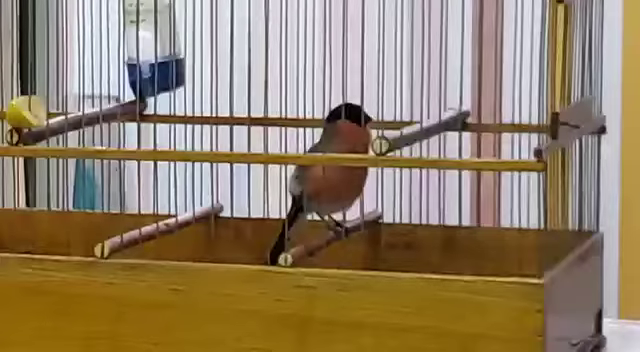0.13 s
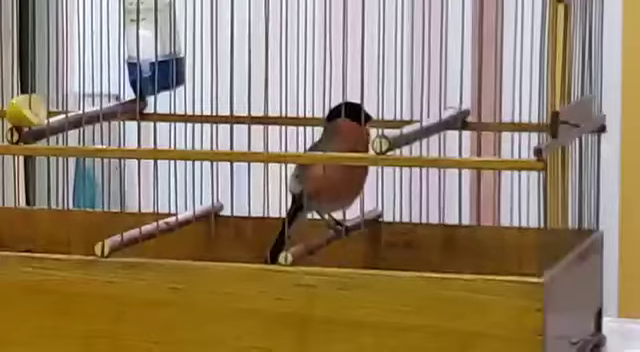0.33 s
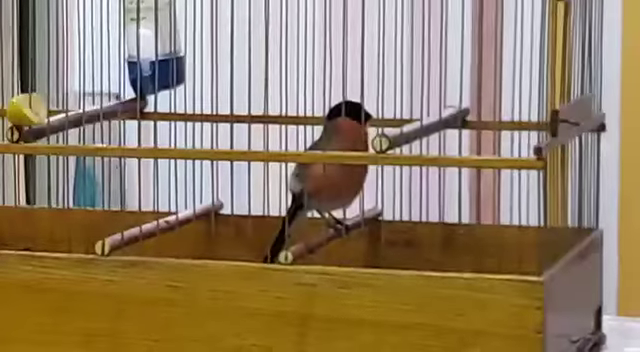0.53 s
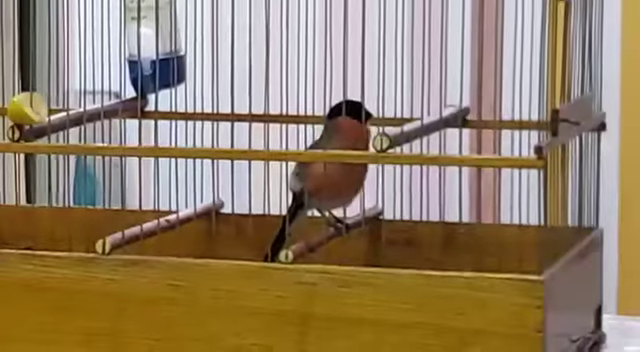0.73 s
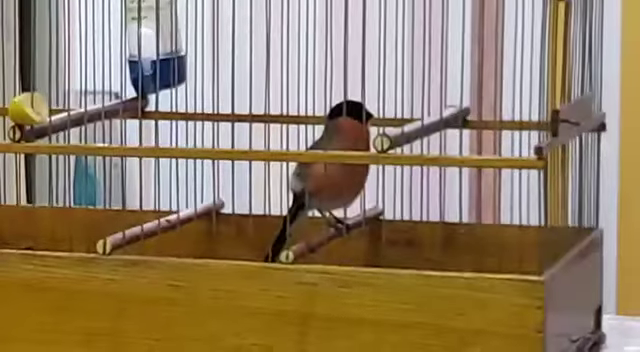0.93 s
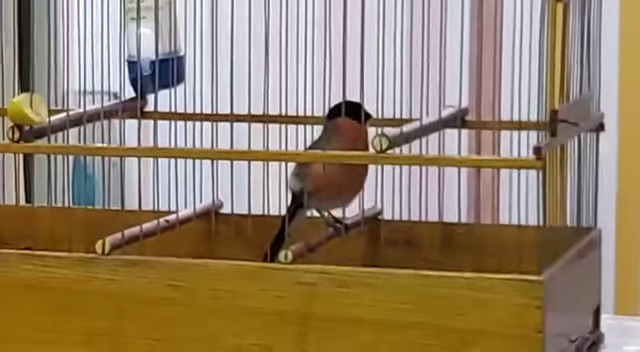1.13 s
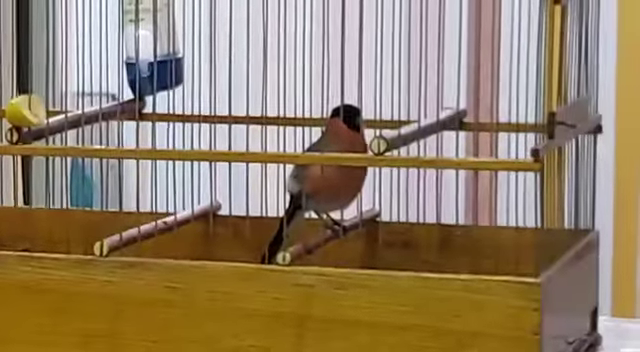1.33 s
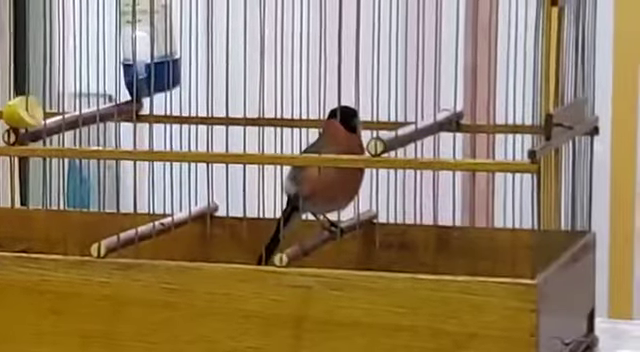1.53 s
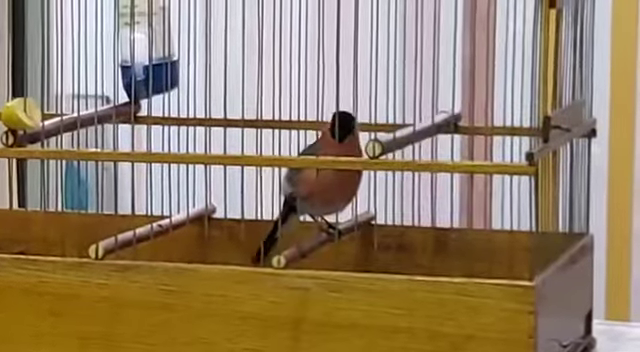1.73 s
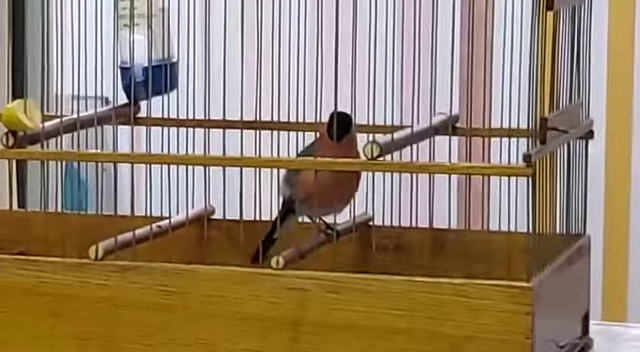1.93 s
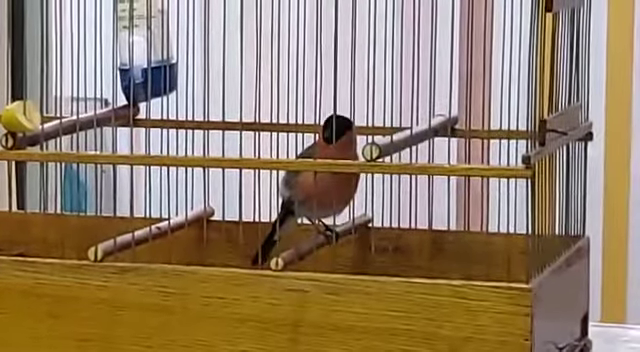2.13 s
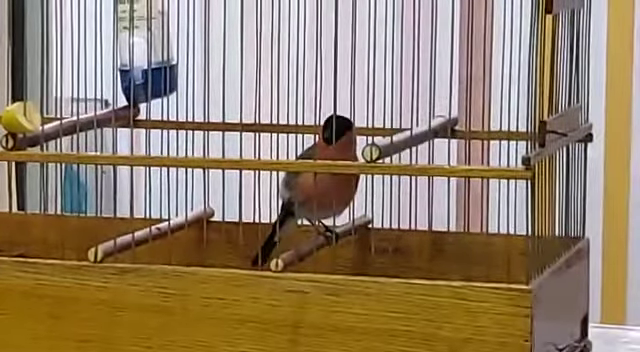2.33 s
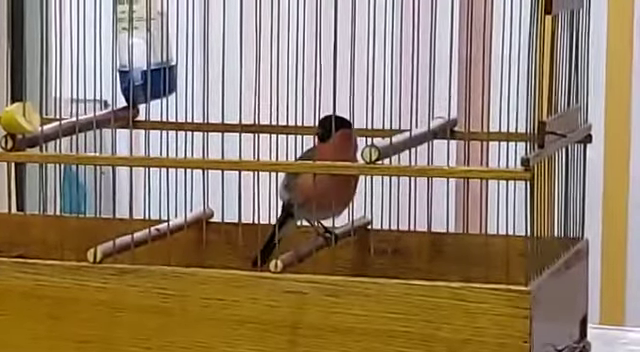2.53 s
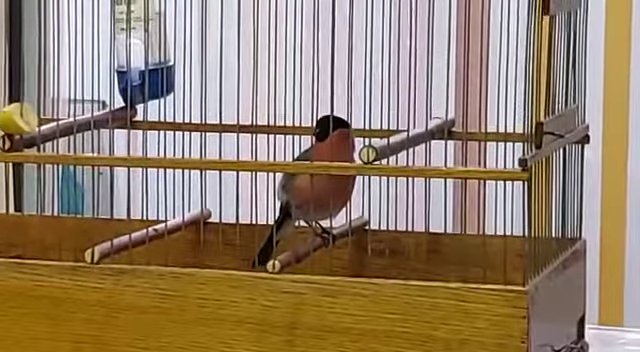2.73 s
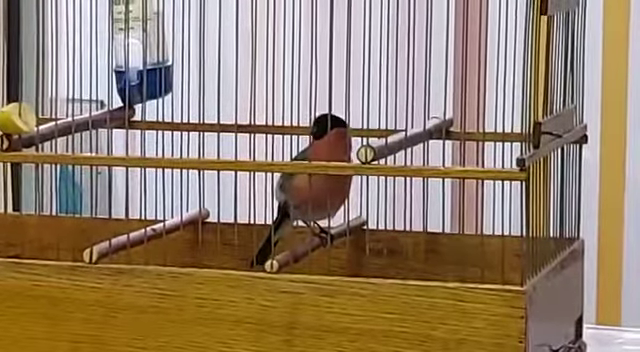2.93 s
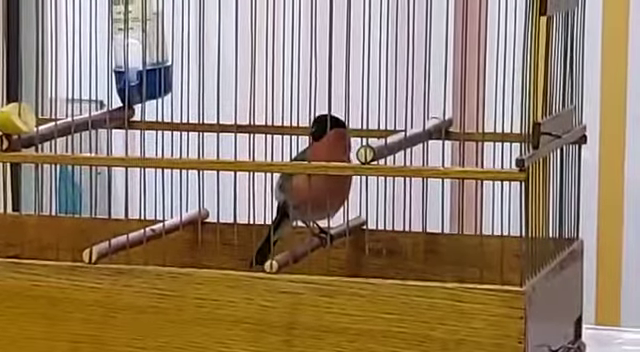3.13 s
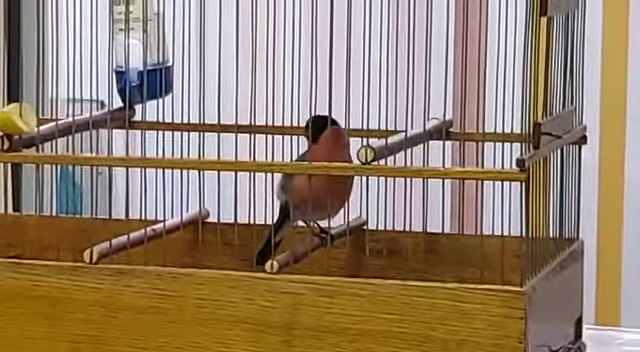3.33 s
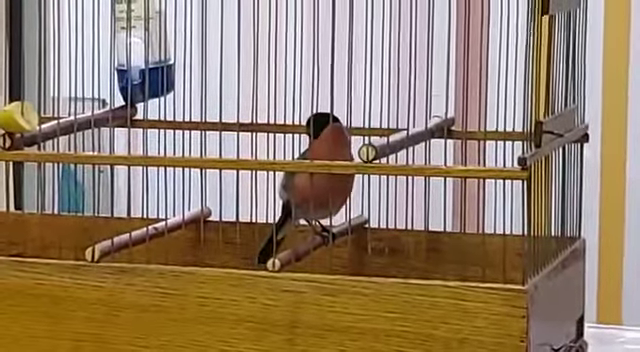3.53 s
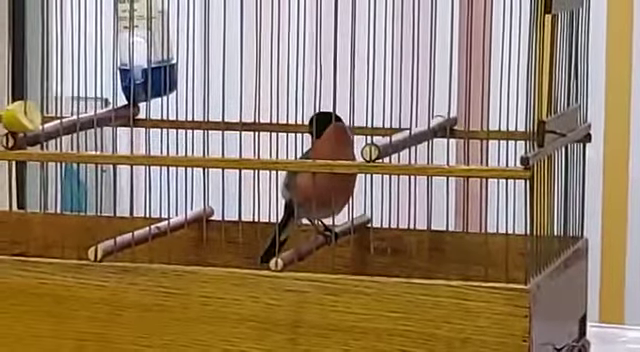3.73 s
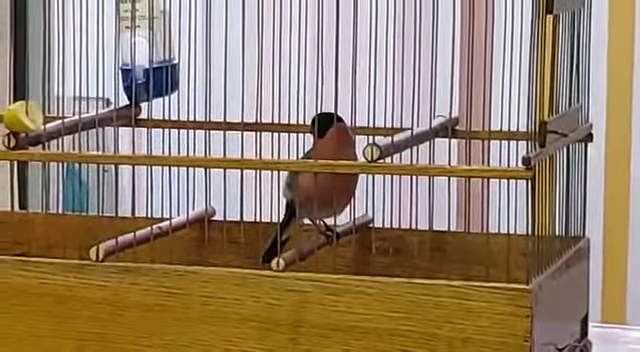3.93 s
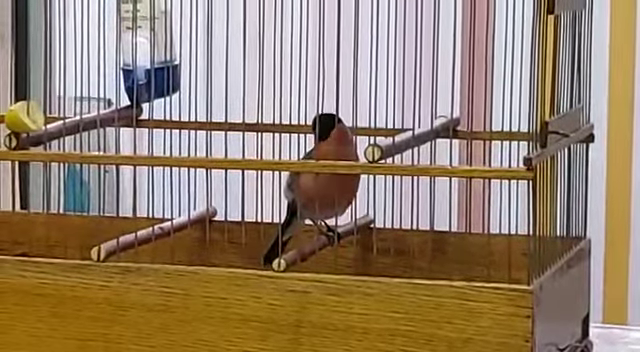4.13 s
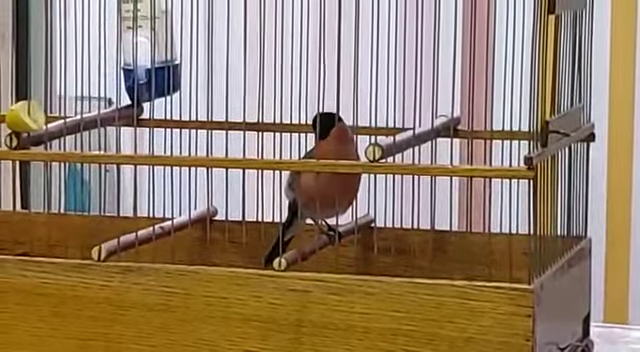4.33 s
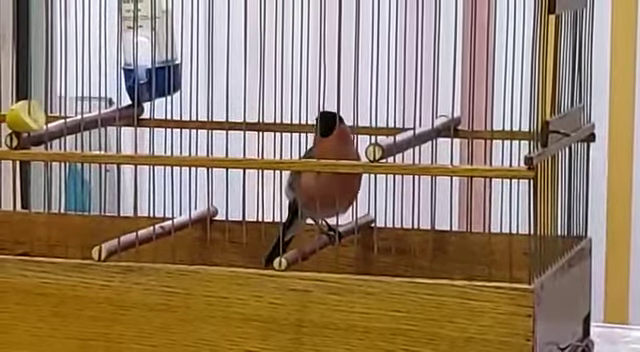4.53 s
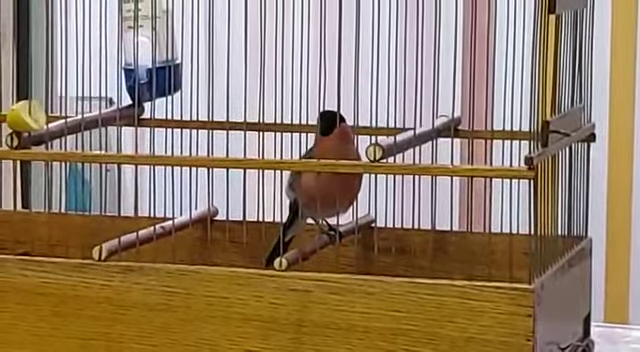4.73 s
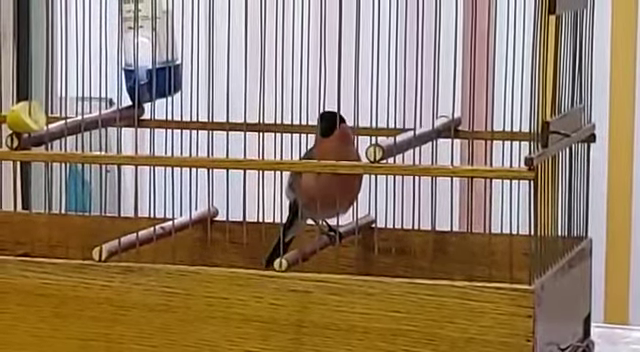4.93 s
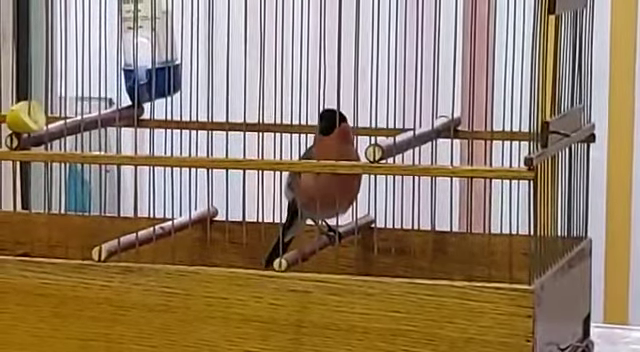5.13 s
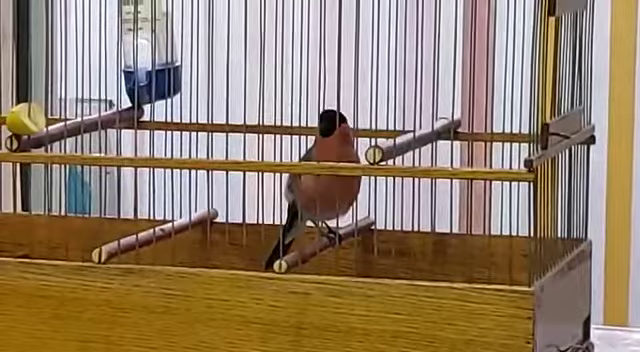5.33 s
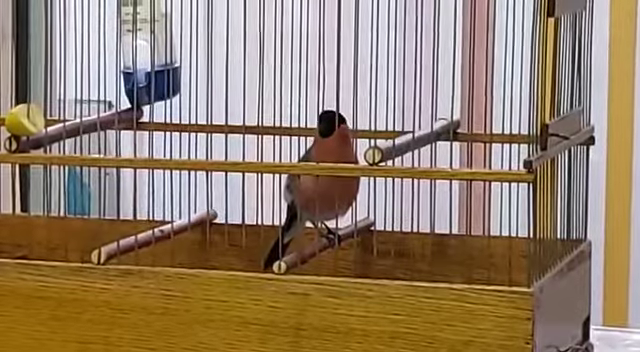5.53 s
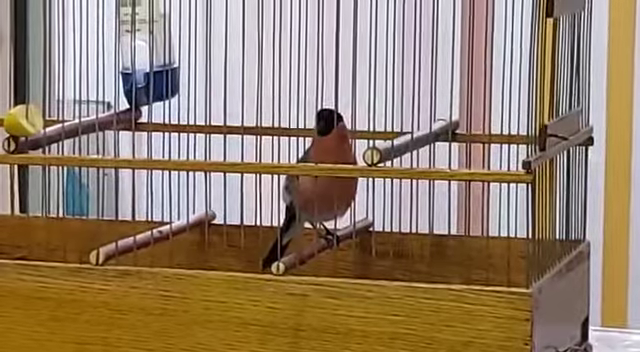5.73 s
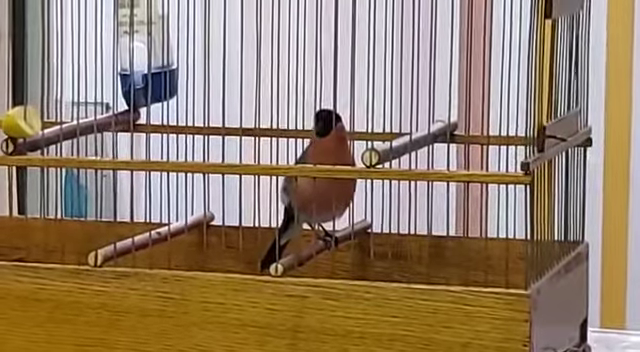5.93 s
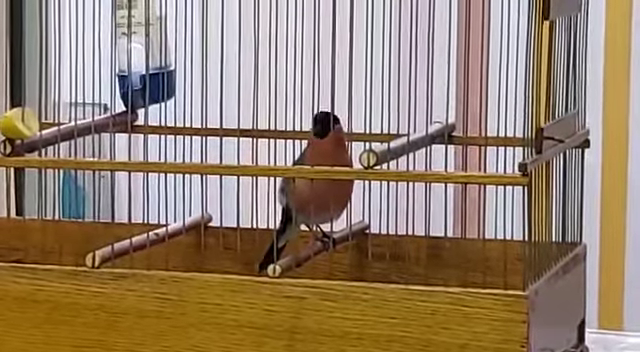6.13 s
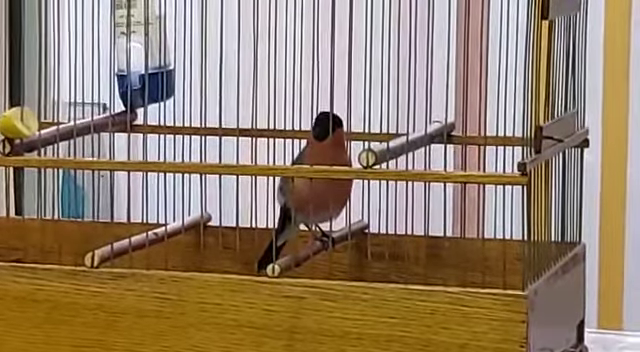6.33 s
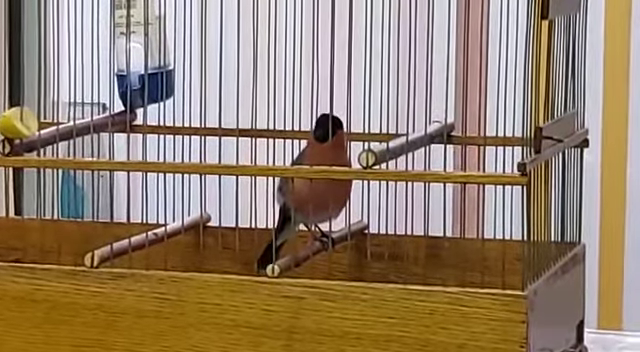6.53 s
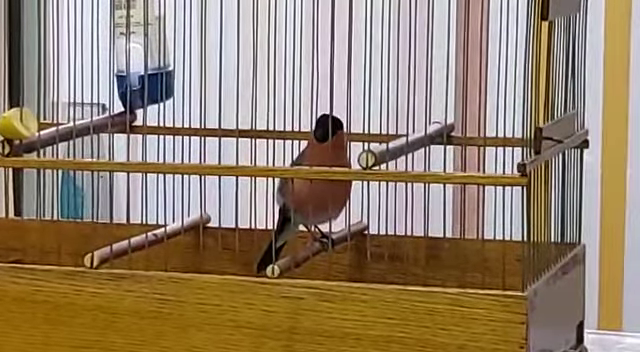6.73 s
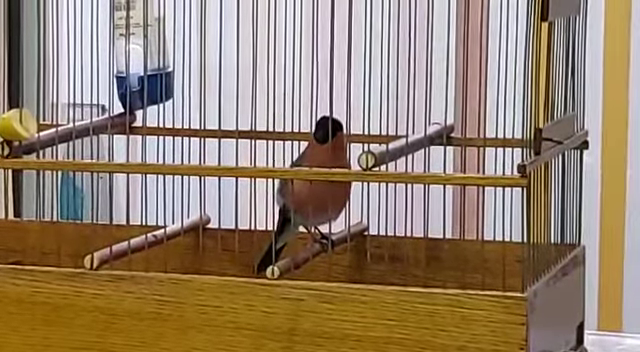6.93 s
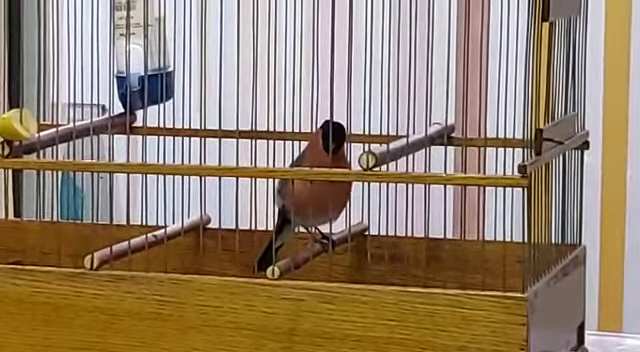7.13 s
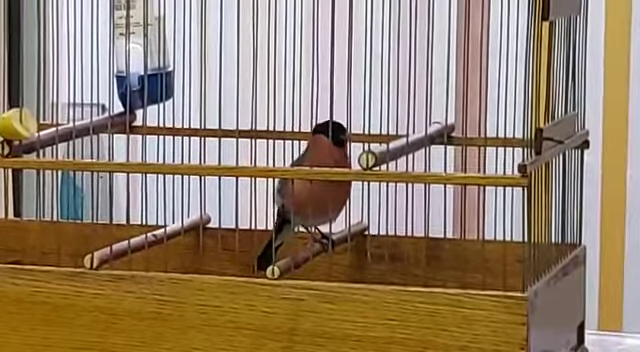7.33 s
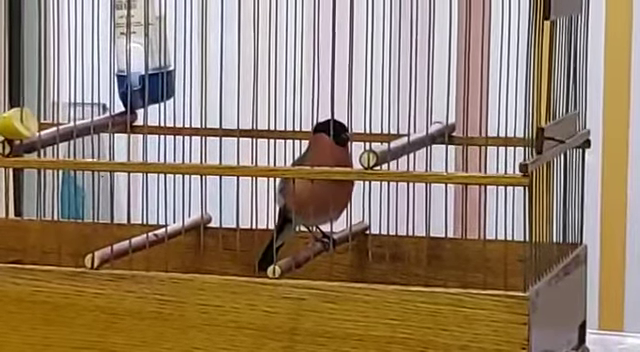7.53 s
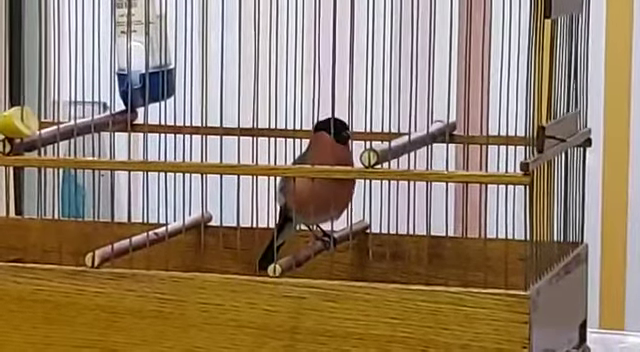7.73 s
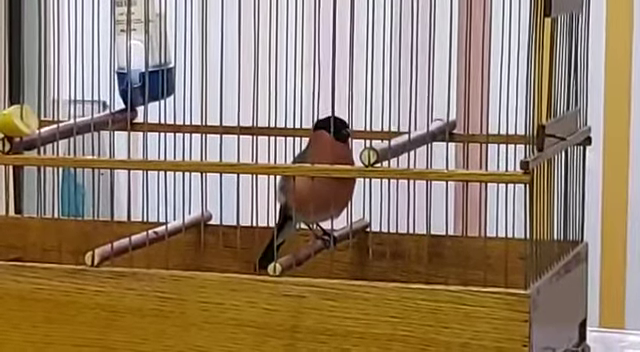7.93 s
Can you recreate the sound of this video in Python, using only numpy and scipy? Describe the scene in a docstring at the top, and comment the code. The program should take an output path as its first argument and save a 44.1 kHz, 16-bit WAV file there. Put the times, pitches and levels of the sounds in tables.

```python
"""Over a low rumble and a faint mains hum, a caged bullfinch sings quietly in a small room. It opens with
creaks, a chip, a drone and an arching note, then gives a squeak and one long whistle. Wheezes, pips, thin
whistles and three nasal hooks follow; drone and arch return, and two slurs and a chip close the song.
The two sides of its syrinx vibrate alone or together, reedy and rasping when pressed hard. Clicks and
hisses fall among the syllables, and near surfaces and the room reflect them all."""
import sys
import numpy as np
from scipy import signal
from scipy.fft import rfft, irfft, next_fast_len
from scipy.io import wavfile
from scipy.ndimage import uniform_filter1d, map_coordinates

SR = 44100
rng = np.random.default_rng(int(sys.argv[2]) if len(sys.argv) > 2 else 0)


def wrap_up_sound(samples):
    """Save the sound to the file named by the first command line argument, as 16-bit audio."""
    columns = np.atleast_2d(samples).T
    # keep every value between -1 and 1, then stretch to whole-number steps
    tamed = np.clip(columns, -1, 1)
    steps = np.round(tamed * 32767).astype(np.int16)
    wavfile.write(sys.argv[1], SR, steps)


N = 356989
TIME = np.arange(N) / SR
TOP_HZ = 15700

# Spectra of turbulent air in the throat and at the beak. Each row: frequency in Hz, relative level in dB.
THROAT_SPECTRUM = [(500, -1.5), (900, 3), (1400, 2), (2100, -1.5), (2800, -14), (4000, -29)]
HISS_SPECTRUM = [(1800, -0.5), (2900, -2.5), (3900, -1), (5000, 5.5), (6400, 8.5), (8000, 0), (11500, -7),
                 (14000, -21.5)]


def amp(db):
    """Convert decibels to an amplitude ratio."""
    return 10 ** (np.asarray(db) / 20)


def unit(x):
    """Normalise to an rms of 1."""
    return x / np.sqrt(np.mean(x ** 2) + 1e-20)


def along(points, hz):
    """Interpolate (Hz, value) points on a logarithmic frequency axis."""
    f, v = np.transpose(points)
    return np.interp(np.log(hz + 1), np.log(f + 1), v)


def over_time(points):
    """Interpolate (seconds, value) points at every sample."""
    return np.interp(TIME, *np.transpose(points))


def wobble(rate):
    """Smooth random modulation: a spline through `rate` knots a second."""
    return map_coordinates(rng.standard_normal(int(N * rate / SR) + 4), [TIME * rate])


def filtered(x, response):
    """Linear filtering: multiply the spectrum by a frequency response."""
    m = next_fast_len(N + 8192)
    return irfft(rfft(x, m) * response(np.fft.rfftfreq(m, 1 / SR)), m)[..., :N]


def noise(spectrum):
    """Spectral shaping turns white noise into coloured noise of rms 1."""
    return unit(filtered(rng.standard_normal(N), lambda hz: amp(along(spectrum, hz))))


def room_rumble(gain_db=4):
    """Partially coherent noise: the two channels are alike in the bass and independent in the treble."""
    # Each row: frequency in Hz, relative level in dB.
    spectrum = [(20, -15.5), (45, 1), (75, -8), (120, -9.5), (170, -4), (260, -10.5), (400, -8.5),
                (530, -14), (1250, -21), (1800, -19.5), (3200, -28.5), (8000, -38)]
    # Each row: time in seconds, relative level in dB.
    levels = [(0.12, -58.5), (1.14, -63.5), (8.09, -61)]
    # Each row: frequency in Hz, correlation between left and right.
    coherence = [(300, 0.74), (2000, 0.018)]
    angle = lambda hz: np.arccos(along(coherence, hz)) / 2
    mid = filtered(noise(spectrum), lambda hz: np.cos(angle(hz)))
    side = filtered(noise(spectrum), lambda hz: np.sin(angle(hz)))
    return np.array([mid + side, mid - side]) * amp(over_time(levels) + gain_db)


def deep_rumble(gain_db=-2):
    """Coherent noise: the lowest rumble swells and fades in both channels together."""
    # Each row: frequency in Hz, relative level in dB.
    spectrum = [(20, 3.5), (45, 3.5), (75, -3.5), (150, -25), (400, -76)]
    # Each row: time in seconds, relative level in dB.
    levels = [(0.34, -60), (0.8, -68.5), (4.94, -74), (5.71, -57), (6.55, -70), (7.58, -62)]
    return noise(spectrum) * amp(over_time(levels) + gain_db)


def mains_hum(waver_db=1):
    """Forced vibration: an appliance hums at even harmonics of the mains, wavering slightly."""
    # Each row: frequency in Hz, level in dB.
    partials = [(100, -63), (200, -66.5)]
    return sum(np.sqrt(2) * amp(db + waver_db * wobble(4.2))
               * np.sin(2 * np.pi * (hz * TIME + rng.random())) for hz, db in partials)


def reflections(x, tail_db=-8, build_s=0.0045, width=0.76):
    """Early reflections from the cage tray and near walls, then exponentially decaying reverberation."""
    # Each row: left delay in seconds, right delay in seconds, gain in dB.
    echoes = [(.00225, .00225, -22), (.00417, .00385, -12), (.0069, .0065, -8), (0.0118, .0125, -11),
              (0.0195, 0.023, -6.5)]
    # Each row: frequency in Hz, seconds to decay by 60 dB.
    decay_times = [(300, 0.073), (2000, 0.34), (6000, 0.28), (13000, 0.27)]
    hz, t, spectra = signal.stft(rng.standard_normal((2, SR // 2)), SR, nperseg=256)
    decay = amp(-60 * t / along(decay_times, hz)[:, None])
    tail = signal.istft(spectra * decay * (1 - np.exp(-t / build_s)), SR, nperseg=256)[1]
    mid, side = signal.fftconvolve(x[None], tail / np.linalg.norm(tail[0]), axes=1)[:, :N]
    early = filtered(x, lambda f: sum(amp(db) * np.exp(-2j * np.pi * np.outer(delays, f))
                                      for *delays, db in echoes))
    return early + amp(tail_db) * np.array([mid + width * side, mid - width * side])


def phrases(notes, edge_s):
    """Envelopes from breakpoints: a soft gate open during each note, then each column per sample."""
    spans = [(rows[0][0], rows[-1][0]) for rows in notes]
    gate = sum(np.interp(TIME, [on - edge_s, on, off, off + edge_s], [0, 1, 1, 0]) for on, off in spans)
    soft_gate = np.sin(np.pi / 2 * np.minimum(gate, 1)) ** 2
    times, *columns = np.vstack(sorted(notes, key=lambda rows: rows[0][0])).T
    return [soft_gate] + [np.interp(TIME, np.sort(times), column) for column in columns]


def hisses(hiss_gain_db=-2):
    """Turbulence: air forced through the throat and beak makes toneless noise."""
    # One list a breath. Each row: time in seconds, relative throat and hiss levels in dB.
    breaths = [
        [(0.295, -59, -75), (0.359, -64, -63), (0.4, -56.5, -63)],
        [(0.6, -66, -69), (0.678, -75, -53), (0.71, -69, -72)],
        [(1.245, -91, -59), (1.31, -84, -61)],
        [(2.03, -64, -85), (2.054, -54.5, -49.5), (2.36, -63, -113)],
        [(3.16, -55.5, -56), (3.22, -63, -60)],
        [(3.375, -70, -74), (3.44, -58.5, -46)],
        [(5.135, -65, -39), (5.165, -63, -54)],
        [(6.02, -59.5, -55), (6.08, -80.5, -65.5)],
        [(6.58, -56.5, -65.5), (6.616, -52, -48.5), (6.85, -62, -102)],
        [(7.35, -55.5, -67), (7.376, -57, -65), (7.45, -66, -67.5)],
    ]
    gate, throat_db, hiss_db = phrases(breaths, edge_s=0.002)
    throat = amp(throat_db) * noise(THROAT_SPECTRUM)
    hiss = amp(hiss_db + hiss_gain_db) * noise(HISS_SPECTRUM)
    return gate * (throat + hiss)


def clicks(snap_db=-7, snap_t60=0.029, ring_db=-13, ring_t60=0.33):
    """Impulse excitation: the syrinx snaps open at each creak and the beak rings, briefly, unsteadily."""
    # Each row: start in seconds, relative level in dB, ring frequency in Hz.
    openings = [(0.298, -39.5, 6070), (0.604, -39, 4880)]
    out = np.zeros(N)
    for start, db, hz in openings:
        age = np.abs(TIME - start)
        snap = amp(snap_db - 60 * age / snap_t60) * unit(noise(HISS_SPECTRUM) + noise(THROAT_SPECTRUM))
        ring = amp(ring_db - 60 * age / ring_t60) * np.sin(2 * np.pi * hz * age + wobble(600))
        out += (TIME >= start) * amp(db) * (snap + ring)
    return out


def chucks(low_hz=1450, high_hz=3000, width_s=0.00853, scatter=0.16):
    """Chaotic vibration, shooting up in pitch as the membrane tightens."""
    # Hoarse bursts in the chips and hooks. Each row: centre in seconds, relative level in dB.
    bursts = [(0.928, -45.5), (5.151, -48.5), (5.427, -47.5), (5.724, -47), (7.625, -43.5)]
    out = np.zeros(N)
    for centre, db in bursts:
        u = (TIME - centre) / width_s
        hz = low_hz * (high_hz / low_hz) ** (.5 + .5 * np.tanh(u)) * (1 + scatter * wobble(1900))
        out += amp(db) * np.exp(-u ** 2 / 2) * wobble(1300) * np.sin(2 * np.pi * np.cumsum(hz) / SR)
    return out


def glides(beak_hz=3100, hoarse=0.019):
    """Linear frequency sweeps: breakpoints of plain notes that sink as they swell and fade."""
    # Each row: start and length in seconds, first and last pitch in Hz, level and pressing in dB.
    sweeps = [(0.146, .085, 1439, 1388, -54, -15.5), (0.412, .028, 1650, 1580, -40.5, -26.5),
              (0.718, 0.04, 1660, 1400, -43, -19)]
    envelope = [(0, -7), (.3, 0), (1, -8)]  # Each row: share of the length, level in dB.
    return [[(start + u * length, first_hz + u * (last_hz - first_hz), note_db + db,
              press_db, beak_hz, hoarse) for u, db in envelope]
            for start, length, first_hz, last_hz, note_db, press_db in sweeps]


def syllables(whistle_beak_hz=7800, squeak_beak_hz=6960, creak_hoarse=0.0356, chip_hoarse=0.0595):
    """Time scaling and transposition turn each gesture into notes for the two sides of the syrinx."""
    # Gestures of the leading side, before scaling. Each row: seconds into the note, pitch in Hz,
    # level in dB, pressing in dB (0 is reedy, -25 pure).
    creak = [(0, 1360, -3.5, -3), (.015, 1480, -14, -0.5), (.037, 1630, 0, -4.5), (.077, 1906, -6, -4)]  # a hoarse climb
    chip = [(0, 1264, -13, -7), (.01, 1897, 2, -23), (.016, 2080, 1, -27.5), (.04, 2186, -7.5, -16)]  # a hoarse upward flick
    drone = [(0, 1933, -5, -5), (.018, 1922, 5, -3), (.042, 1820, 1.5, -3), (.074, 1807, -15.5, -4.5)]  # a reedy chord that sags
    drop = [(0, 1871, -15, -5.5), (.022, 1986, 1, -12), (.04, 1995, 1, -23.5), (.047, 1620, -5, -21),
            (.062, 1385, -16.5, -7.5)]  # ends each drone: the pressure eases, the note lifts and tumbles
    arch = [(0, 1872, -15, -8), (.035, 2180, -3.5, 1), (0.059, 2303, -26.5, 2.5), (.077, 2253, -19, 8.5),
            (.084, 2130, 4.5, -2.5), (.092, 1990, -1.5, -3), (.104, 1594, -11.5, 3)]  # squeezed thin at the top, bursting on the way down
    wheeze = [(0, 1798, -3.5, 0), (.013, 1950, 2, 2), (.029, 2310, -10, -6), (.05, 2460, -10.5, 6),
              (.066, 2380, -18.5, 8.5)]  # a rise that ends pressed hard
    pip = [(0, 1680, -16.5, -21.5), (.014, 1923, 0.5, -27.5), (.026, 1940, -4, -35)]  # both sides sweep up and beat
    thread = [(0, 2620, -24, -8), (.06, 2625, -8.5, -16.5), (0.089, 2605, -22.5, -2.5),
              (.135, 2612, -2.5, -19.5), (.172, 2575, -17, -12), (0.221, 2560, -18, -21)]  # a thin high whistle that swells twice
    hook = [(0, 1300, -18.5, -3.5), (.021, 1375, -9, -5), (.056, 1402, -7.5, 1), (.078, 1406, -14, 0.5),
            (.089, 1690, 0.5, -12), (.099, 1560, -5, -18.5), (.11, 1280, -14.5, -19)]  # a low nasal note ending in a flick
    slur = [(0, 1710, -9.5, -34), (.034, 1788, 0, -20), (.051, 1892, 2, -44), (.058, 1610, -13, -28),
            (.067, 1063, -21, -17)]  # a soft whistle that lifts and collapses
    # Gestures of the second side. Each row: seconds into the note, pitch in Hz, level in dB.
    creak_second = [(.039, 991, -11), (.064, 1065, -5), (.092, 1155, -11)]
    drone_second = [(.008, 2388, -7), (.045, 2352, -14.5), (.076, 2320, -19.5)]
    arch_second = [(.012, 2106, -19.5), (0.044, 2475, -13), (.08, 2590, -14)]
    wheeze_second = [(.028, 1567, -15.5), (.048, 1620, -16.5), (.065, 1625, -27)]
    pip_second = [(0, 2010, -17.5), (.015, 2145, -2), (0.025, 2310, -10)]
    hook_second = [(.077, 2860, -21), (.086, 3111, -9.5), (.1, 2950, -23)]  # only in the flick
    slur_second = [(-.009, 2060, -18), (0, 2180, -16.5)]  # a grace note
    # Repeats of each gesture; the gape of the beak picks out other overtones each time. Each row:
    # start and length in seconds, pitch factor, added level and pressing in dB, beak resonance in Hz.
    creaks = [(.299, .077, 1, -44.5, -2, 6700), (.604, .077, 1.01, -43.5, -3.5, 5480)]
    chips = [(.917, .04, 0.99, -41, 3, 3460), (7.619, 0.0274, 1, -39.5, 2, 3500)]
    drones = [(1.243, 0.0751, 0.97, -45.5, 3.5, 6222), (6.02, .076, 0.98, -39.5, 0, 4890)]
    drops = [(1.321, .06, 1, -36, 3, 3910), (6.102, .064, 1, -41, -1, 4970)]
    arches = [(1.712, .098, 1.015, -38, 1.5, 7230), (6.323, .109, 1, -34, -0.5, 5400)]
    wheezes = [(3.15, .06, 1.02, -37.5, -1.5, 6960), (3.364, .072, 1, -34.5, -1.5, 6600)]
    pips = [(3.623, 0.021, 1, -28, -18, 4045), (4.003, 0.021, 0.99, -23.5, 1.5, 7900),
            (4.353, .026, 1, -26, 4.5, 8000)]
    threads = [(3.74, .225, 1.005, -43, 5.5, 5147), (4.095, .16, .998, -38.5, -3, 7740)]
    hooks = [(5.063, 0.11, 0.99, -36, 0, 7350), (5.345, 0.098, 0.99, -39, 0.5, 4000),
             (5.634, .12, 1, -32.5, -2, 5372)]
    slurs = [(6.969, .069, 0.98, -30, -1.5, 3600), (7.254, .065, 0.99, -30.5, -3, 3570)]
    # Notes sung once. Each row: time in seconds, pitch in Hz, level in dB, pressing in dB.
    squeak = [(2.458, 2294, -49.5, -5.5), (2.465, 2190, -30.5, -9.5), (2.474, 2262, -41.5, -2.5),
              (2.485, 2420, -49, 4.5)]  # its pitch dips and recovers
    whistle = [(2.826, 1700, -55.5, -20.5), (2.848, 1830, -43.5, -28), (2.865, 1919, -33.5, -35),
               (2.91, 1965, -27.5, -26), (2.965, 1999, -30, -26), (2.995, 1972, -42.5, -36)]
    kinds = [(creaks, creak, creak_second, creak_hoarse), (chips, chip, None, chip_hoarse),
             (drones, drone, drone_second, 0), (drops, drop, None, 0), (arches, arch, arch_second, 0),
             (wheezes, wheeze, wheeze_second, 0), (pips, pip, pip_second, 0), (threads, thread, None, 0),
             (hooks, hook, hook_second, 0), (slurs, slur, slur_second, 0)]
    lead = [[(*row, beak_hz, 0) for row in note]
            for note, beak_hz in [(whistle, whistle_beak_hz), (squeak, squeak_beak_hz)]]
    second = []
    for notes, gesture, other_side, hoarse in kinds:
        for start, length, factor, note_db, note_press_db, beak_hz in notes:
            stretch = length / gesture[-1][0]
            lead.append([(start + stretch * s, factor * hz, note_db + db, note_press_db + press_db,
                          beak_hz, hoarse) for s, hz, db, press_db in gesture])
            if other_side:
                second.append([(start + stretch * s, factor * hz, note_db + db)
                               for s, hz, db in other_side])
    return lead, second


def membrane(gate, hz, db, press_db, beak_hz, hoarse, jitter=0.0066, wander=0.00305, collapse=0.075,
             octave_db=-30, slack_hz=2300, scratch_db=-6, beak_db=9, beak_width_hz=850, off_beak_db=-6):
    """Source and filter: amplitude, phase and beak-coloured overtones of one side of the syrinx."""
    # Colour of the overtones. Each row: frequency in Hz, gain in dB.
    beak_response = [(2750, -3), (3250, -6), (3750, -9), (4200, -10), (4750, 1), (5150, -12.5),
                     (5600, -1.5), (6800, -4), (7500, -11), (8200, -4), (9500, -16), (11300, -11.5),
                     (14000, -31.5)]
    # As its tension collapses, the pitch sinks and the membrane flaps irregularly and scratches.
    sinking = np.clip(-np.gradient(np.log(hz)) * SR / 22, 0, 1) ** 2
    unrest = hoarse + jitter * amp(press_db / 2) + collapse * sinking
    phase = 2 * np.pi * np.cumsum(hz * (1 + unrest * wobble(1500) + wander * wobble(60))) / SR
    size = gate * amp(db)
    # A slack membrane swings lopsidedly, which adds the octave.
    overtones = size * amp(octave_db) / (1 + (hz / slack_hz) ** 10) * np.sin(2 * phase)
    overtones += size * sinking * amp(scratch_db + press_db) * noise(HISS_SPECTRUM)
    on = gate > 0
    for k in range(2, 10):
        harmonic_hz = k * hz[on]
        resonance_db = off_beak_db + beak_db * np.exp(-((harmonic_hz - beak_hz[on]) / beak_width_hz) ** 2)
        drive_db = press_db[on] * (k / 2) ** 0.46  # relaxing, it loses its highest overtones first
        level_db = along(beak_response, harmonic_hz) + resonance_db + drive_db
        overtones[on] += size[on] * amp(level_db) * np.sin(k * phase[on]) * (harmonic_hz < TOP_HZ)
    return size, phase, overtones


def syrinx(second_overtones_db=5, air_db=-13, coupling=.5, mixing=.42, rasp=.1):
    """Nonlinear coupling: two sides in one airstream modulate each other; turbulence frays overtones."""
    lead_notes, second_notes = syllables()
    gate, hz, db, *voicing = phrases(lead_notes + glides(), edge_s=0.0062)
    size_a, phase_a, overtones_a = membrane(gate, hz, db, *voicing)
    size_b, phase_b, overtones_b = membrane(*phrases(second_notes, edge_s=.004), *voicing)
    balance = 2 * size_a * size_b / (size_a ** 2 + size_b ** 2 + 1e-14)
    beat = balance * np.cos(phase_a - phase_b)
    modulation = 1 + coupling * beat + rasp * wobble(1600)
    overtones = (overtones_a + amp(second_overtones_db) * overtones_b) * modulation
    reediness = np.sqrt(np.abs(uniform_filter1d(overtones ** 2, size=200)))
    leaking_air = amp(air_db) * noise(HISS_SPECTRUM)
    buzz = reediness * (mixing * beat + leaking_air)  # the beat sounds as a difference tone
    return size_a * np.sin(phase_a) + size_b * np.sin(phase_b) + overtones + buzz


def scene(bird_db=-1.15):
    """Superposition in stereo: differences of level and phase place the bird and the background."""
    # The bird turns its head. Each row: time in seconds, left minus right in dB.
    facing = [(3.4, -1), (5.7, -0.3), (6.05, -1), (7.7, -.8)]
    # Phase at the two microphone ports. Each row: frequency in Hz, lead of the left in radians.
    phase_lead = [(2000, 0.044), (3000, 0.48), (5000, 1.1), (8000, 1.66)]
    # Stereo balance. Each row: frequency in Hz, left minus right in dB.
    bird_tilt = [(1200, 0), (2000, -0.5), (3200, 2), (6000, -5), (9000, 2.5)]
    background_tilt = [(60, -2), (400, -3.5), (2000, -2), (10000, -1.2)]  # lies to the right
    split = np.array([[.5], [-.5]])  # half of each difference goes to each channel
    bird = amp(bird_db) * (syrinx() + chucks() + hisses() + clicks())
    placing = lambda hz: np.exp(1j * split * along(phase_lead, hz)) * amp(split * along(bird_tilt, hz))
    song = filtered(bird + reflections(bird), placing) * amp(split * over_time(facing))
    background = room_rumble() + mains_hum() + deep_rumble()
    return song + filtered(background, lambda hz: amp(split * along(background_tilt, hz)))


def record(dry, start_s=.103, fade_s=0.0019):
    """Gating and band limiting: the microphone opens after a moment and passes nothing above TOP_HZ."""
    return filtered(dry * np.clip((TIME - start_s) / fade_s, 0, 1), lambda hz: hz < TOP_HZ)


dry = scene()
out = record(dry)
wrap_up_sound(out)
```